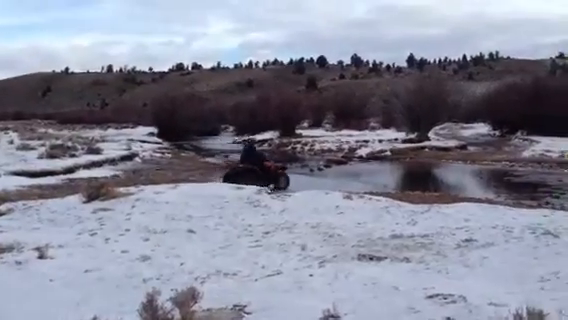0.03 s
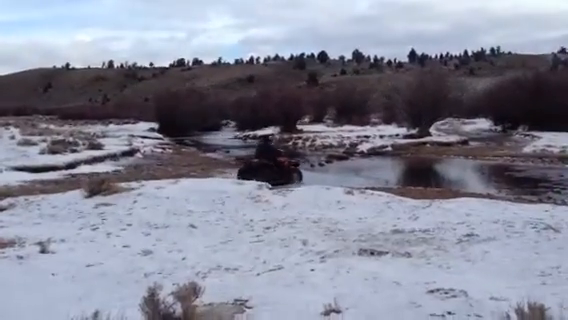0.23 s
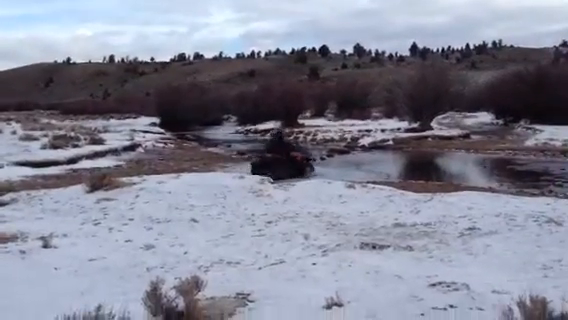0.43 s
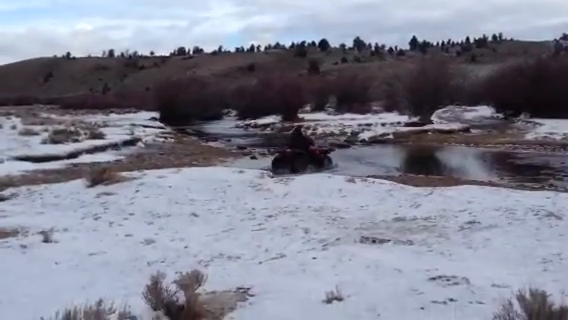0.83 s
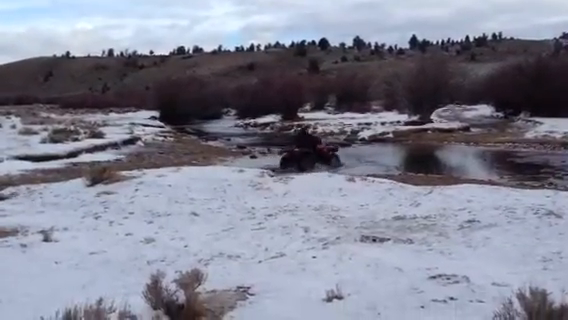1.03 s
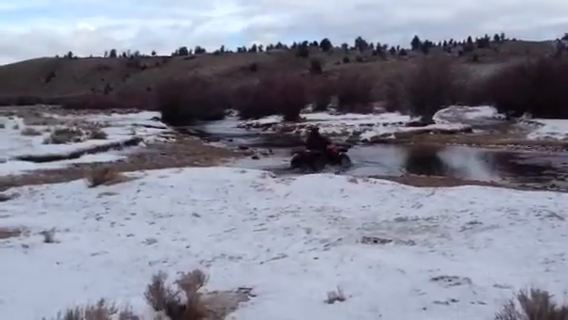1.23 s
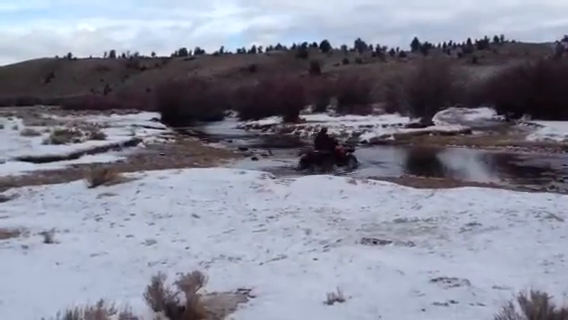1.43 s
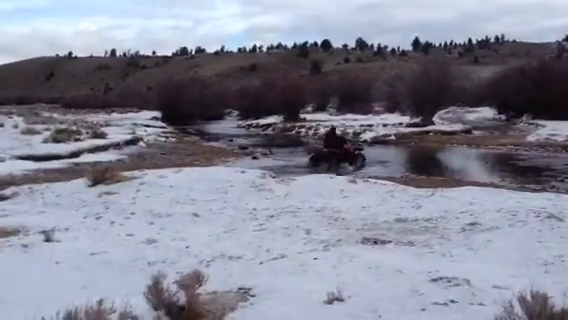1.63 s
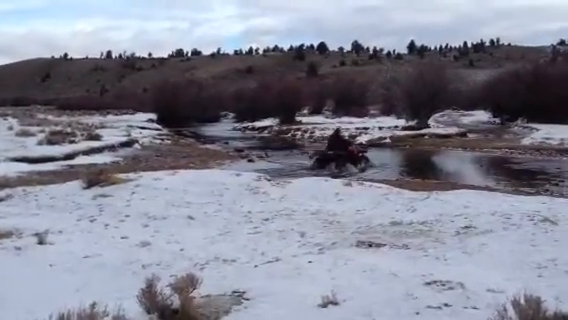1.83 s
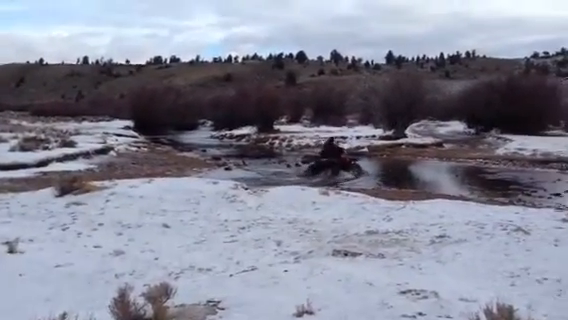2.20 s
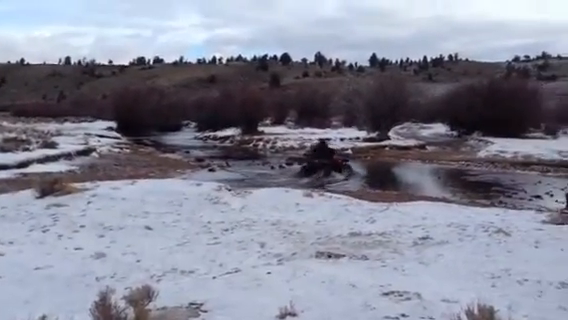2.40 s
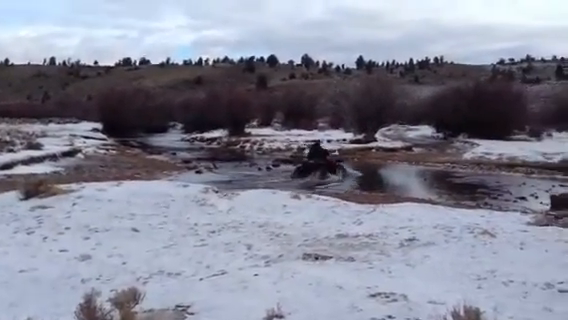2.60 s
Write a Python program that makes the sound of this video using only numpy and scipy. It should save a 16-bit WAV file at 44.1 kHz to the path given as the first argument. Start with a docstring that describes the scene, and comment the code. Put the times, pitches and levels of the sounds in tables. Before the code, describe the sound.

A quad bike idles close by throughout, with a muffled putter, light high ticking and rapid metallic clacks that grow louder from about 1.6 seconds. Farther off, wheels stir shallow water, peaking near 0.6 seconds and fading by 1.3. Dull wind buffets hit the microphone all along, louder than the engine, popping hardest from 1.0 to 1.2 seconds and again near 1.75 and 2.25.

```python
"""Dull puffs of wind and a wash of water are heard over a quad bike idling close by.
Its exhaust putters, its valves chirp and its engine clacks once a turn, the clacks growing louder.
The water is thrown up by a second bike wading into a shallow river some way off, and soon fades.
The wind hits the microphone in short buffets; the hardest ones pop."""
import sys
import numpy as np
from scipy import signal
from scipy.fft import rfft, irfft, next_fast_len
from scipy.io import wavfile
from scipy.ndimage import map_coordinates

SR = 44100
rng = np.random.default_rng(int(sys.argv[2]) if len(sys.argv) > 2 else 0)


def wrap_up_sound(samples):
    """Save the sound to the file named by the first command line argument, as 16-bit audio."""
    columns = np.atleast_2d(samples).T
    # keep every value between -1 and 1, then stretch to whole-number steps
    tamed = np.clip(columns, -1, 1)
    steps = np.round(tamed * 32767).astype(np.int16)
    wavfile.write(sys.argv[1], SR, steps)


N = 121275
T = np.arange(N) / SR


def amp(db):
    return 10 ** (np.asarray(db) / 20)


def unit(x):
    """Scale a signal to an average (rms) strength of 1."""
    return x / np.sqrt(np.mean(x ** 2) + 1e-20)


def curve(rows):
    """Join (time, value) points with straight lines."""
    return np.interp(T, *np.transpose(rows))


def wobble(per_second):
    """A smooth curve through so many random points a second."""
    return map_coordinates(rng.standard_normal(int(N * per_second / SR) + 4), [T * per_second])


def filtered(x, gain_at):
    """Turn each frequency up or down by gain_at(hz)."""
    size = next_fast_len(N + 8192)
    return irfft(rfft(x, size) * gain_at(np.fft.rfftfreq(size, 1 / SR)), size)[:N]


def tone_gain(tone, hz):
    """Read a (frequency, level) table as a gain at hz."""
    points_hz, db = np.transpose(tone)
    return amp(np.interp(np.log(hz + 1), np.log(points_hz), db))


def noise(tone):
    """Noise shaped by a (frequency, level) table."""
    return unit(filtered(rng.standard_normal(N), lambda hz: tone_gain(tone, hz)))


def resonance(centre_hz, width_hz):
    """Noise ringing in one band of frequencies."""
    hiss = rng.standard_normal(N)
    return unit(filtered(hiss, lambda hz: 1 / (1 + (2 * (hz - centre_hz) / width_hz) ** 2)))


def pulses(times, rise_s, hold_s, fade_s, scatter_db=1.2):
    """Slightly uneven loudness pulses: each rises, holds, then drops 60 dB in fade_s."""
    out = np.zeros(N)
    for at, db in zip(times, scatter_db * rng.standard_normal(len(times))):
        rise = np.clip((T - at) / rise_s + 1, 0, 1)
        out += rise * amp(db - 60 * np.clip((T - at - hold_s) / fade_s, 0, 2))
    return out


# water thrown up by the wheels (time [s], level [dB])
WASH_LEVEL = [(0, -47), (.13, -43.5), (.28, -47.5), (.37, -44.5), (.48, -43), (.6, -40), (.72, -44.5),
              (.85, -45), (.95, -48), (1.3, -53.5), (2.0, -54), (2.13, -52.5), (2.3, -56.5), (2.75, -58.5)]
# tone of the water (frequency [Hz], level [dB])
WATER_TONE = [(200, -0.5), (700, 3), (1500, -3.5), (2400, -1), (3500, 1), (5000, -5), (8000, -16),
              (15000, -25.5)]
# single slaps of water (time [s], level [dB], fade time [s])
SLAPS = [(0.589, -33.5, 0.063), (0.878, -41, 0.039), (1.112, -37, 0.028), (2.121, -37.5, 0.055),
         (2.413, -43, 0.034)]

def water():
    """Distant wheels stir up a wash, grainy with spray, and a few slaps."""
    spray = amp(0.654 * wobble(30.744) + 1.41 * wobble(400))
    wash = amp(curve(WASH_LEVEL)) * unit(spray * noise(WATER_TONE))
    slaps = sum(amp(db) * pulses([at], 0.00187, 0, fade_s) for at, db, fade_s in SLAPS)
    return wash + slaps * noise(WATER_TONE)


def clink(at_s=0.53, db=-39.5):
    """One small bright ring, perhaps a stone under a wheel."""
    return amp(db) * pulses([at_s], 0.0019, 0, fade_s=0.01) * resonance(4200, width_hz=300)


# tone of wind on the microphone (frequency [Hz], level [dB])
WIND_TONE = [(25, -49.5), (50, -46.5), (80, -23), (125, -6.5), (180, 1), (260, 0), (350, -2), (490, 1),
             (650, -0.5), (1500, -7)]

def eddies(cutoff_hz, size, steepness=3.67):
    """Air swirling at the microphone: a rumble with little deep bass, dull above the cutoff."""
    hz = np.fft.rfftfreq(size, 1 / SR)
    gain = tone_gain(WIND_TONE, hz) / np.sqrt(1 + ((hz + 1) / cutoff_hz) ** (2 * steepness))
    random_phases = np.exp(2j * np.pi * rng.random(len(hz)))
    return unit(irfft(gain * random_phases, size))


# wind between the buffets (time [s], level [dB])
BREEZE_LEVEL = [(0, -47.5), (.2, -44), (.38, -50), (.55, -44), (.85, -32), (.97, -33.5), (1.06, -27.5),
                (1.27, -40), (1.36, -46), (1.5, -36), (1.7, -28), (1.85, -39), (2.05, -41), (2.2, -38),
                (2.45, -37), (2.65, -41.5), (2.75, -33)]
# short shoves of wind (time [s], length [s], level [dB], cutoff [Hz])
BUFFETS = [(0.049, 0.0177, -34, 128), (0.149, 0.0228, -29, 352), (0.204, 0.0249, -32, 627),
           (0.23, 0.0189, -24, 219), (0.281, 0.0377, -34.5, 493), (0.26, 0.0101, -24.5, 78),
           (.35, 0.0159, -27, 104), (0.448, 0.0242, -21.5, 441), (0.439, 0.038, -34, 72),
           (0.518, 0.0119, -27, 286), (0.571, 0.0367, -31.5, 419), (0.638, 0.0206, -26.5, 417),
           (.668, 0.016, -35.5, 504), (0.695, 0.029, -34.5, 900), (0.752, 0.021, -35.5, 70),
           (.756, 0.022, -25.5, 478), (0.804, 0.0192, -24, 430), (0.829, 0.0091, -25.5, 341),
           (0.877, 0.0174, -27, 572), (.917, 0.0134, -19.5, 327), (0.969, 0.005, -29, 763),
           (1.021, 0.0229, -13, 582), (1.039, 0.0185, -16.5, 564), (1.095, 0.0105, -24, 682),
           (1.128, 0.0175, -21.5, 546), (1.148, 0.01085, -12.5, 518), (1.17, 0.0253, -19, 558),
           (1.199, 0.0078, -25.5, 528), (1.22, 0.00637, -17, 512), (1.29, 0.0694, -39.5, 264),
           (1.414, 0.0233, -31, 254), (1.487, 0.0216, -36, 497), (1.567, 0.01946, -20.5, 589),
           (1.593, 0.0089, -19.5, 613), (1.616, 0.0217, -26, 490), (1.706, 0.0264, -27.5, 527),
           (1.742, 0.0174, -16, 483), (1.758, 0.0074, -19, 423), (1.802, 0.00655, -20, 423),
           (1.899, .028, -28.5, 310), (1.961, 0.0149, -25, 346), (2.133, 0.00645, -24.5, 692),
           (2.146, 0.0067, -23.5, 486), (2.182, 0.0411, -29, 481), (2.226, 0.023, -20.5, 188),
           (2.259, 0.0225, -22, 551), (2.299, 0.0128, -26.5, 458), (2.347, 0.0112, -27, 290),
           (2.38, 0.008, -22.5, 385), (2.423, 0.0144, -30.5, 504), (2.458, 0.0106, -33, 584),
           (2.493, 0.0133, -22.5, 422), (2.53, 0.0394, -33.5, 383), (2.607, 0.06, -33, 241),
           (2.731, 0.0227, -31.5, 270)]

def wind():
    """A breeze flutters on the microphone, with buffets that quickly swell and die away."""
    flutter = amp(4.35 * wobble(44.786))
    out = amp(curve(BREEZE_LEVEL)) * unit(flutter * eddies(cutoff_hz=335, size=N))
    squareness = 2.088  # 2 is a plain bell shape; more gives steeper sides
    for at, length, db, cutoff_hz in BUFFETS:
        near = np.flatnonzero(abs(T - at) < .08)
        bell = np.exp(-2 * abs((T[near] - at) / length) ** squareness)
        strength = amp(db) * np.sqrt(np.mean(bell ** 2))
        out[near] += strength * unit(bell * eddies(cutoff_hz, len(near)))
    return out


# pops in the hardest buffets (time [s], level before the bass cut [dB], cutoff [Hz])
POPS = [(.7565, -22, 700), (1.0129, -8.5, 2063), (1.0166, -9.5, 430), (1.0239, -8.5, 1195),
        (1.041, -12, 740), (1.124, -17, 700), (1.1433, -11.5, 740), (1.1527, -10.5, 515),
        (1.7428, -11.5, 467), (1.748, -19, 1220), (1.759, -14.5, 465), (2.252, -13.5, 594),
        (2.412, -31.5, 1090), (2.49, -20, 520)]
# ragged crackle around the hardest pops (time [s], length [s], level [dB])
CRACKLES = [(1.024, .02, -27.5), (1.16, 0.0193, -44), (1.748, 0.0125, -34.5)]
# tone of the crackle (frequency [Hz], level [dB])
CRACKLE_TONE = [(400, -11), (900, 2.5), (1400, -1), (2000, -10.5), (2800, -19.5), (4500, -48)]

def wind_pops():
    """Each pop is one quick swing of air pressure; the hardest tear into a crackle."""
    swings = np.zeros(N)
    for at, db, cutoff_hz in POPS:
        phase = (T - at) * np.pi * cutoff_hz
        swings += amp(db) * 2 * phase * np.exp(-phase ** 2)
    bass_cut = signal.butter(2, 120, "high", fs=SR, output="sos")  # the microphone's wind filter
    bursts = sum(amp(db) * np.exp(-2 * ((T - at) / length) ** 2) for at, length, db in CRACKLES)
    crackle = unit(amp(4 * wobble(600)) * noise(CRACKLE_TONE))
    return signal.sosfilt(bass_cut, swings) + bursts * crackle


# tone of the running engine's whirr (frequency [Hz], level [dB])
WHIRR_TONE = [(25, -23), (80, -1), (140, 12), (240, 8), (380, -7.5), (550, 11.5), (900, 5), (1500, -1.5),
              (2400, -7), (3100, -12.5), (4100, -9), (7000, -10.5), (10000, -16.5), (12500, -16),
              (15500, -26.5)]

def whirr(db=-46.5):
    """The engine's constant, slightly fluttering noise."""
    return amp(db + 3.5 * wobble(70)) * noise(WHIRR_TONE)


# idle speed; one four-stroke cycle is two turns of the shaft (time [s], speed [cycles/s])
IDLE_SPEED = [(0, 10.0), (.75, 10.1), (1.2, 10.27), (1.7, 10.3), (1.9, 10.47), (2.15, 10.42), (2.35, 10.68),
              (2.75, 10.72)]

def cycle_times(place, start_place=.447):
    """The moments when the engine passes one place (0 to 1) in its cycle."""
    cycles = start_place + np.cumsum(curve(IDLE_SPEED)) / SR
    marks = np.arange(int(cycles[-1]) + 1) + place
    return np.interp(marks[(marks > cycles[0]) & (marks < cycles[-1])], cycles, T)


# tone of the exhaust (frequency [Hz], level [dB])
EXHAUST_TONE = [(30, -39.5), (70, -9), (130, 4.5), (220, -8.5), (450, -11.5), (1200, -30), (4000, -71)]

def exhaust(db=-42):
    """One muffled puff leaves the pipe each cycle."""
    puffs = pulses(cycle_times(0.7006), rise_s=0.0034, hold_s=0.00845, fade_s=0.502)
    return amp(db) * puffs * noise(EXHAUST_TONE)


# the two valves (place in the cycle [0-1], level [dB], hold time [s], fade time [s])
VALVES = [(.92, -47.5, 0.00666, 0.061), (0.3, -49, 0.00294, 0.031)]
# how the chirps swell and shrink (time [s], added level [dB])
VALVE_SWELL = [(0, -4), (.8, -0.5), (1.25, 1), (1.7, -1.5), (2.05, -0.5), (2.3, -3.5), (2.75, -5.5)]
# tone of the scrape (frequency [Hz], level [dB])
VALVE_TONE = [(2500, 7.5), (4300, 5), (6000, -2.5), (7500, -1), (8200, -5.5), (9200, 0), (10300, -8.5),
              (11600, -1.5), (15000, -8)]
# ringing of the valve parts (frequency [Hz], width [Hz], level against the scrape [dB])
VALVE_RINGS = [(6470, 240, -12), (7430, 540, -10), (8895, 400, -8), (11140, 340, -18), (12200, 600, -18)]

def valves():
    """Two short scrapes a cycle make the valve parts ring, heard as chirps."""
    chirps = sum(amp(db) * pulses(cycle_times(place), 0.0016, hold_s, fade_s)
                 for place, db, hold_s, fade_s in VALVES)
    ring = sum(amp(db) * resonance(hz, width) for hz, width, db in VALVE_RINGS)
    return amp(curve(VALVE_SWELL)) * chirps * unit(noise(VALVE_TONE) + ring)


# ringing of the engine's metal shell (frequency [Hz], width [Hz], level [dB])
CASING_RINGS = [(3750, 300, -60), (4255, 170, -57), (4875, 130, -63), (6370, 140, -68)]
# how that ringing swells and shrinks (time [s], added level [dB])
CASING_SWELL = [(0, -2.5), (.9, -1.5), (1.3, 0), (2.75, -1.5)]

def casing(turns, trim_db=-2):
    """The clack on every turn keeps the engine's shell ringing."""
    strikes = unit(pulses(turns, rise_s=0.0043, hold_s=0, fade_s=0.415))
    ring = sum(amp(db) * resonance(hz, width) for hz, width, db in CASING_RINGS)
    return amp(trim_db + curve(CASING_SWELL)) * strikes * ring


# how hard the engine clacks (time [s], level [dB])
CLACK_FORCE = [(0, -62), (1.0, -52.5), (1.5, -52.5), (1.68, -43), (2.08, -47), (2.35, -38.5), (2.5, -37.5),
               (2.6, -40), (2.75, -38)]
# tone of a clack (frequency [Hz], level [dB])
CLACK_TONE = [(500, 9.5), (1500, 0), (2600, -1), (3600, 5.5), (5500, 5), (7500, -2.5), (10000, -12.5),
              (15000, -19)]
# bands that vary from clack to clack (frequency [Hz], width [Hz], level against the tone [dB])
CLACK_BANDS = [(3972, 590, -10.5), (5240, 1380, -14)]

def clacks(turns, rise_s=.0025, fade_s=0.0126):
    """A loose part strikes once a turn and rattles once more; harder blows sound brighter."""
    force_db = curve(CLACK_FORCE)
    blow = pulses(turns, rise_s, hold_s=.002, fade_s=fade_s)
    tail = amp(-12) * pulses(turns, rise_s, hold_s=0, fade_s=0.337)
    rebound = amp(-17) * pulses(turns + 0.0078, rise_s, hold_s=0, fade_s=fade_s)
    bands = sum(amp(db + 5 * wobble(20.988)) * resonance(hz, width) for hz, width, db in CLACK_BANDS)
    roughness = amp(3 * wobble(900))
    metal = unit(roughness * (noise(CLACK_TONE) + bands))
    dull = filtered(metal, lambda hz: 1 / (1 + (hz / 7950) ** 10))
    treble = amp(0.25 * (force_db - force_db.max())) * (metal - dull)
    return amp(force_db) * (blow + tail + rebound) * (dull + treble)


def engine():
    """One shaft times the puffs, clacks and chirps of the nearby bike, over its whirr."""
    turns = np.sort(np.r_[cycle_times(0), cycle_times(.5)])
    return whirr() + exhaust() + valves() + casing(turns) + clacks(turns)


def scene():
    """River, wind and engine together in one channel."""
    return (water() + clink() + wind() + wind_pops() + engine())[None]


def record(dry, top_hz=15580):
    """The very highest treble is cut away."""
    return np.array([filtered(channel, lambda hz: hz < top_hz) for channel in dry])


dry = scene()
out = record(dry)
wrap_up_sound(out)
```